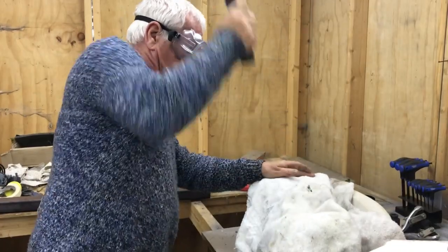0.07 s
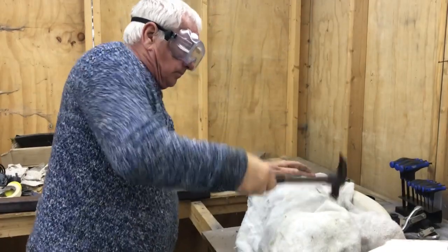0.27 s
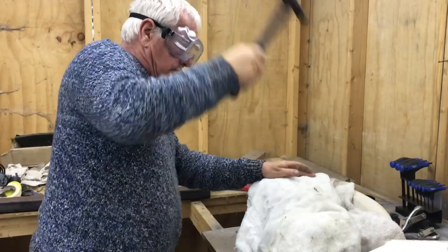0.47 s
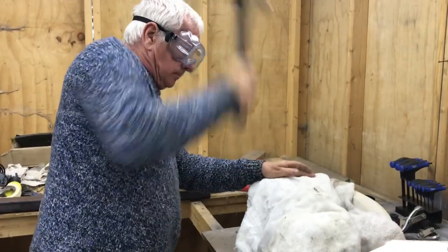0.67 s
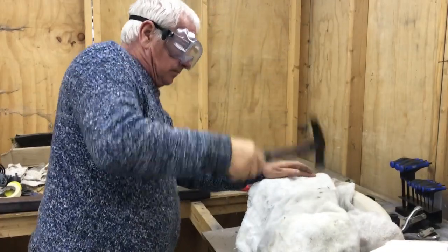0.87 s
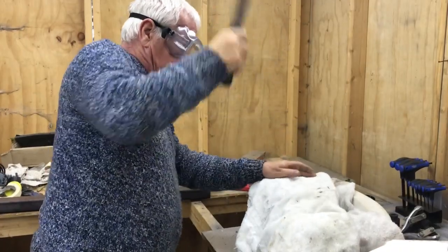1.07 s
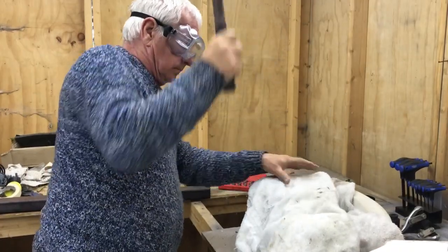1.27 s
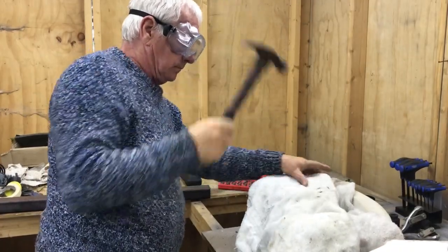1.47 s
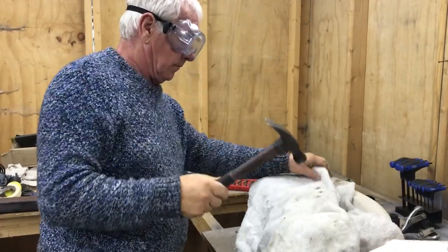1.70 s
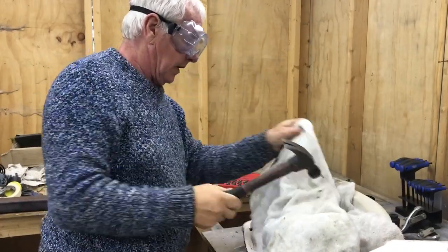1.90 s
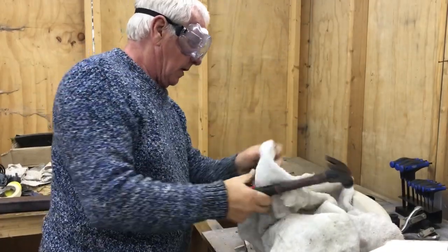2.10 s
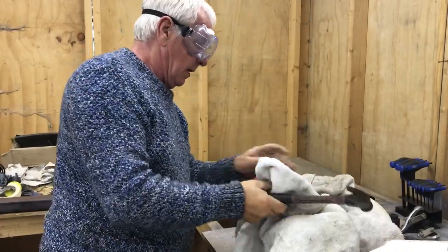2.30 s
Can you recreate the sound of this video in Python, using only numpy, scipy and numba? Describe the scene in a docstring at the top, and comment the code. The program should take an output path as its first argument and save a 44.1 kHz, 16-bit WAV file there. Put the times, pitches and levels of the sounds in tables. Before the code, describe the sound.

Two loud hammer blows land on cloth-covered metal in a small wooden workshop, with a short clatter and bench thud, the second leaving a thin ring. Afterwards come small handling clicks and a soft rustle of cloth.

```python
"""Two hammer blows in a workshop

A hammer twice hits a cloth-wrapped metal part on a wooden bench in a small timber workshop. Each blow
makes the part clatter and the bench boom, and a limiter holds it down; the second leaves a thin steel
ring. Light knocks and clicks follow, and the cloth rustles as it is lifted, over a low room rumble."""
import sys
import numpy as np
from scipy import signal
from scipy.fft import rfft, irfft
from scipy.io import wavfile
from scipy.ndimage import uniform_filter1d, minimum_filter1d
from numba import njit

SR = 44100
rng = np.random.default_rng(int(sys.argv[2]) if len(sys.argv) > 2 else 0)


def transcribe(signal):
    """Save signal, clipped to [-1, 1], as a 16-bit WAV file at the path in sys.argv[1]."""
    frames = np.atleast_2d(signal).T
    limited = np.clip(frames, -1, 1)
    pcm = np.round(limited * 32767).astype(np.int16)
    wavfile.write(sys.argv[1], SR, pcm)


N = 108045
T = np.arange(N) / SR
EVENT_SIZE = 36000  # samples in one short sound
AGE = T[:EVENT_SIZE]  # seconds since that sound began
BUILD_CYCLES = 1.9  # counted in vibrations, so low notes take longer to build up


def undb(db):
    """Turns decibels into a gain."""
    return 10 ** (np.asarray(db) / 20)


def look_up(table, hz):
    """Reads a table between its rows, with octaves evenly spaced."""
    pitches, values = np.array(table, float).T
    return np.interp(np.log(hz + 1e-6), np.log(pitches), values)


def unit(x):
    """Scales x to an average power of 1."""
    return x / np.sqrt(np.mean(x ** 2))


def place(x, start_s):
    """Starts a sound at a given time."""
    return np.pad(x, (max(int(start_s * SR), 0), N))[:N]


def shape(x, gain_db):
    """Turns each pitch up or down by gain_db(hz), then sets the power to 1."""
    hz = np.fft.rfftfreq(len(x), 1 / SR)
    return unit(irfft(rfft(x) * undb(gain_db(hz)), len(x)))


def noise(colour, tilt_db=0, size=EVENT_SIZE):
    """Noise with a colour (balance of low and high), tilted by tilt_db per octave above 500 Hz."""
    def gain_db(hz):
        octaves = np.log2(np.maximum(hz, 500) / 500)
        return look_up(colour, hz) + tilt_db * octaves - 30 * (hz < 20)
    return shape(rng.standard_normal(size), gain_db)


def patchy(x, depth_db=2.5, width_hz=60):
    """Crowded high vibrations make narrow, random patches of pitch louder or softer."""
    hills = rng.standard_normal(len(x))
    steps = np.arange(len(x))
    return shape(x, lambda hz: depth_db * np.interp(hz / width_hz, steps, hills) * hz / (hz + 2000))


def decay(fade_s, hold_s=0):
    """Holds, then dies away by 60 dB in fade_s."""
    return np.exp(-np.log(1000) * np.maximum(AGE - hold_s, 0) / fade_s)


def fade_octaves(x, fades, build_cycles=0):
    """Each octave of x builds up, then dies away at its own rate."""
    lowest_hz = 31.25
    octave = np.log2(np.clip(np.fft.rfftfreq(EVENT_SIZE, 1 / SR), lowest_hz, 16000) / lowest_hz)
    spectrum, out = rfft(x), 0
    for k in range(10):
        hz = lowest_hz * 2 ** k
        band = irfft(spectrum * np.maximum(1 - abs(octave - k), 0))
        rise = 1 - np.exp(-AGE * hz / (build_cycles + 1e-9))
        out += band * rise * decay(look_up(fades, hz), hold_s=0.011)
    return out


def ring(tones, hold_s=0):
    """A struck thing rings with its own pure tones, which build up and die away."""
    out = 0
    for hz, fade_s, db in tones:
        rise = 1 - np.exp(-AGE * hz / BUILD_CYCLES)
        wave = np.sin(2 * np.pi * (hz * AGE + rng.random()))
        out += undb(db) * decay(fade_s, hold_s) * rise * wave
    return out


def background(rumble_hz=59, width_hz=21):
    """Quiet workshop air and a low, wavering rumble."""
    # colour of the air: pitch_hz, relative_db
    air_colour = [(25, -6), (75, -3), (110, -13), (200, -8), (400, -18.5), (750, -18), (1300, -22),
                  (2200, -35), (3300, -40), (7000, -44.5), (15500, -47)]
    # loudness of the rumble: time_s, level_db
    rumble_levels = [(0, -44), (.65, -50), (1.05, -45.5), (1.45, -55), (1.7, -57), (2.45, -58)]
    hz = np.fft.rfftfreq(N, 1 / SR)
    rumble = irfft(rfft(rng.standard_normal(N)) / (1 + (2 * (hz - rumble_hz) / width_hz) ** 2), N)
    rumble_db = np.interp(T, *np.array(rumble_levels).T)
    return undb(-57.5) * noise(air_colour, size=N) + undb(rumble_db) * unit(rumble)


def room(x, echo_db):
    """Adds the short wash of echoes from the timber walls."""
    # colour of the echoes: pitch_hz, relative_db
    colour = [(50, 2), (200, 3), (500, 1.5), (1000, 0), (2000, 4), (3200, -4), (5000, -10), (15000, 4.5)]
    # how long they last: pitch_hz, fade_s
    fades = [(60, 0.82), (200, 0.83), (600, 0.21), (2000, 0.42), (5000, 0.31), (15000, 0.2)]
    tail = place(fade_octaves(noise(colour), fades), start_s=0.006)
    tail /= np.sqrt(np.sum(tail ** 2))
    return x + undb(echo_db) * signal.fftconvolve(x, tail)[:N]


def cloth(crease_db=2, crease_s=0.004):
    """Soft swells of rubbing, made grainy by creases catching and letting go."""
    # strokes of cloth and sleeve: centre_s, half_length_s, level_db, tilt_db_per_octave
    strokes = [(0.01, 0.018, -52, -7.5), (0.724, 0.059, -65, -1), (1.25, 0.021, -60, 5),
               (1.425, 0.015, -58.5, 7.5), (1.594, 0.22, -66.5, 3), (1.9, 0.053, -64.5, 5),
               (1.971, 0.036, -56, 1.5), (2.221, 0.21, -65.5, 1.5)]
    # colour of the rubbing: pitch_hz, relative_db
    colour = [(150, 0.5), (400, 0), (1300, 8), (2300, -4.5), (3000, -0.5), (4000, -8.5), (6000, -12.5),
              (9000, -19), (15000, -25.5)]
    jitter = unit(uniform_filter1d(rng.standard_normal(N), int(crease_s * SR)))
    creases = unit(undb(crease_db * jitter))
    rubbing = 0
    for centre_s, half_length_s, db, tilt_db in strokes:
        swell = np.exp(-0.5 * ((T - centre_s) / half_length_s) ** 2)
        rubbing += undb(db) * noise(colour, tilt_db, size=N) * swell
    return creases * rubbing


def knock(db, fade_s, bass_db):
    """A short wooden thud, heavier or lighter below about 400 Hz."""
    # colour of the wood: pitch_hz, relative_db
    wood = [(40, -6), (200, -0.5), (400, -4.5), (800, -6), (1400, -13.5), (2200, -21), (4000, -23.5),
            (7000, -34.5), (15000, -46.5)]
    colour = [(hz, level + bass_db / (1 + (hz / 400) ** 2)) for hz, level in wood]
    return undb(db) * noise(colour) * decay(fade_s)


def chink(db):
    """A loose metal piece rings briefly."""
    # its tones: pitch_hz, fade_s, relative_db
    tones = [(4005, .2, -8), (4624, .17, 0), (4655, .2, -6), (7526, .17, -14), (9717, .17, -18),
             (10815, .17, -19)]
    return undb(db) * ring(tones)


def click(db, peak_hz, lift_db, tilt_db, width_hz=1800, rise_s=0.00064):
    """A dry snap, strongest around one pitch, and its duller wash from the walls."""
    # colour of a click: pitch_hz, relative_db
    colour = [(200, -39), (700, -22), (1600, -13.5), (2400, -3.5), (5600, -3.5), (8000, -8), (11000, -11.5),
              (15500, -12)]
    snap = shape(noise(colour, tilt_db), lambda hz: lift_db / (1 + (2 * (hz - peak_hz) / width_hz) ** 2))
    snap *= (1 - np.exp(-AGE / rise_s)) * decay(fade_s=0.019)
    wash = undb(-16) * noise(colour, tilt_db - 3) * decay(fade_s=0.24)
    return undb(db) * (snap + wash)


def small_sounds():
    """Dull knocks, metal chinks and dry clicks around the blows."""
    # the dying boom of an earlier blow, then things settling on the bench:
    # start_s, level_db, fade_s, bass_lift_db
    knocks = [(0.0, -49.5, 0.57, 21.5), (0.45, -44, 0.53, 20.5), (1.028, -40.5, 0.24, -0.5),
              (1.652, -50.5, 0.11, -40), (2.41, -50.5, 0.088, -17)]
    # loose metal chinking: start_s, level_db
    chinks = [(0.573, -67), (1.028, -47)]
    # sharp handling clicks: start_s, level_db, peak_hz, peak_lift_db, tilt_db_per_octave
    clicks = [(1.077, -39.5, 3720, 13, -0.5), (1.162, -49, 3120, 12, -1.5), (1.4609, -22.5, 3000, 4.5, -1),
              (1.65, -35.5, 4140, 9.5, -4.5), (1.753, -49, 3630, 9, -8), (1.855, -52, 4000, 18, -9)]
    out = 0
    for sound, events in (knock, knocks), (chink, chinks), (click, clicks):
        for start_s, *settings in events:
            out += place(sound(*settings), start_s)
    return out


def clatter(blow):
    """The struck part clatters in a dense burst of noise."""
    # colour of the clatter, one list for each blow: pitch_hz, relative_db
    colours = [
        [(24, -30), (40, -3), (158, -2.5), (266, -6), (333, -5.5), (577, -16.5), (722, -14), (1100, -6),
         (1220, -11), (2060, -7), (2640, -17), (4030, -16.5), (15500, -35.5)],
        [(24, -28), (40, 1.5), (120, -12), (224, 0.5), (427, -9), (562, -12), (740, -11), (949, -9.5),
         (2160, -17), (2840, -13), (4920, -24.5), (5720, -21), (15500, -42)],
    ]
    # how long it lasts: pitch_hz, fade_s
    fades = [(50, 0.36), (200, 0.19), (600, 0.34), (2000, 0.24), (4000, .22), (8000, 0.2), (15000, 0.2)]
    return fade_octaves(patchy(noise(colours[blow])), fades, BUILD_CYCLES)


def bench_boom(blow):
    """The blow shakes the wooden bench, which booms."""
    # low tones of the bench: pitch_hz, fade_s, first_blow_db, second_blow_db
    tones = [(54, 0.42, -31, -24.0), (72.4, 0.54, -31.5, -28), (95.1, 0.5, -25.0, -22.5),
             (151.9, 0.45, -22.0, -24), (170.5, 0.28, -18.0, -17), (210, 0.45, -21.0, -29.5),
             (230.6, 0.27, -32.5, -19.5), (344.8, 0.25, -25.0, -22)]
    return ring([(hz, fade_s, levels[blow]) for hz, fade_s, *levels in tones], hold_s=0.016)


def part_ring(blow, cloth_factor=0.75):
    """The metal part rings, cut shorter by the cloth around it."""
    # tones of the part: pitch_hz, unwrapped_fade_s, first_blow_db, second_blow_db
    tones = [(564, 0.25, -23.0, -18.0), (599, 0.25, -22.0, -28.0), (817, 0.25, -22.0, -18.0),
             (921, 0.25, -29.0, -23.0), (993, 0.25, -18.0, -26.0), (1030, 0.25, -20.0, -21.0),
             (1083, 0.25, -19.0, -30.0), (1111, 0.25, -20.0, -24.0), (1248, 0.25, -28.0, -23.0),
             (1455, 0.25, -17.0, -28.0), (1490, 0.25, -21.0, -31.0), (1600, 0.25, -33.0, -25.0),
             (1824, 0.25, -23.0, -27.0), (2047, 0.25, -21.0, -34.0), (2369, .25, -26, -31),
             (2444, .2, -31, -27), (2837, .25, -34, -31), (3980, .22, -29, -38), (5556, .2, -35, -32)]
    return ring([(hz, fade_s * cloth_factor, levels[blow]) for hz, fade_s, *levels in tones], hold_s=0.016)


def buzz():
    """The part keeps buzzing against the bench."""
    # colour of the buzz: pitch_hz, relative_db
    colour = [(200, -21), (900, -3.5), (1500, 1), (2200, -2), (2700, -12), (4500, -8.5), (7000, -35.5),
              (15000, -34.5)]
    return patchy(noise(colour)) * decay(fade_s=0.52)


def hammer():
    """Each blow shakes the part, the bench and the hammer's own steel head."""
    # hammer blows: start_s, clatter_db, steel_db, buzz_db
    blows = [(0.2168, -7.5, -72, -32.5), (0.7708, -8, -50.5, -34.5)]
    # tones of the steel head: pitch_hz, fade_s, relative_db
    steel_tones = [(8559, .85, 0), (12090, 1.1, -13)]
    out = 0
    for blow, (start_s, clatter_db, steel_db, buzz_db) in enumerate(blows):
        hit = undb(clatter_db) * clatter(blow) + bench_boom(blow) + part_ring(blow)
        lingering = undb(buzz_db) * buzz() + undb(steel_db) * ring(steel_tones)
        out += place(hit + lingering, start_s)
    return out


def scene():
    """Mixes everything into one channel."""
    mix = room(hammer(), echo_db=-22.5) + room(small_sounds(), echo_db=-16) + cloth() + background()
    return mix[None]


@njit
def follow_peaks(x, sink):
    """Jumps to each peak and sinks back."""
    out, level = np.empty(len(x)), 0.
    for i in range(len(x)):
        level = max(x[i], level * sink)
        out[i] = level
    return out


def record(dry, limit_db=-3, release_s=0.02, top_hz=16000):
    """The microphone's limiter quickly turns loud peaks down; the highest treble is cut."""
    peak = follow_peaks(abs(dry[0]), np.exp(-1 / (release_s * SR)))
    gain = np.minimum(1, undb(limit_db) / (peak + 1e-9))
    gain = uniform_filter1d(minimum_filter1d(gain, size=45), size=45)  # smoothed over about 1 ms
    treble_cut = signal.ellip(8, 0.2, 70, top_hz, fs=SR, output="sos")
    return signal.sosfilt(treble_cut, dry * gain)


dry = scene()
out = record(dry)
transcribe(out)
```